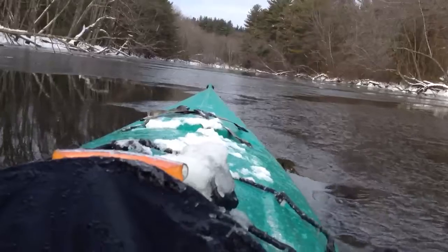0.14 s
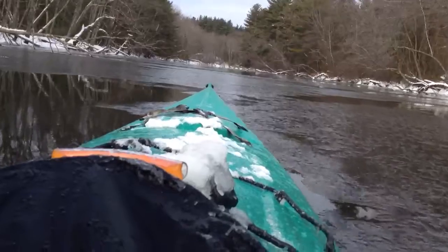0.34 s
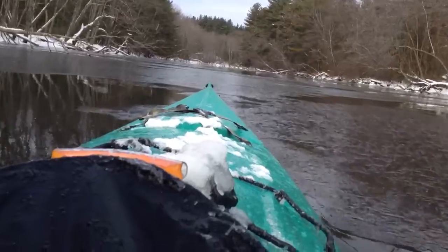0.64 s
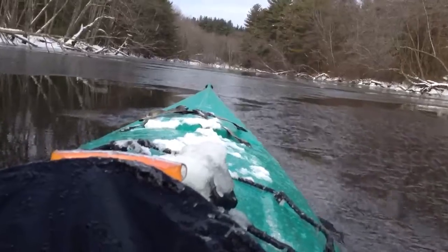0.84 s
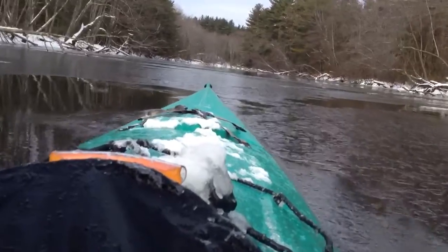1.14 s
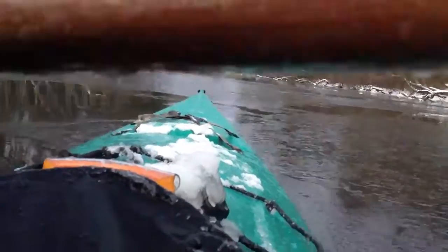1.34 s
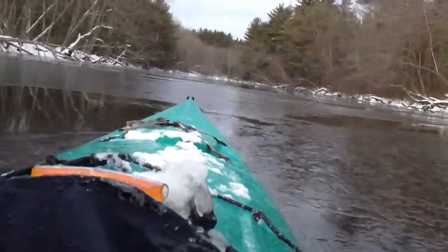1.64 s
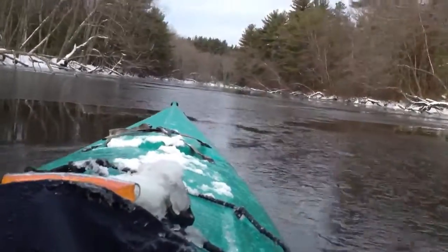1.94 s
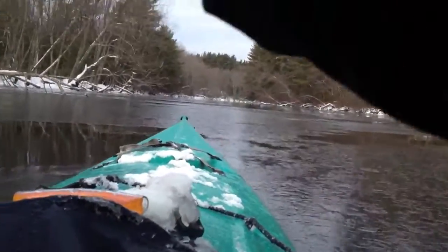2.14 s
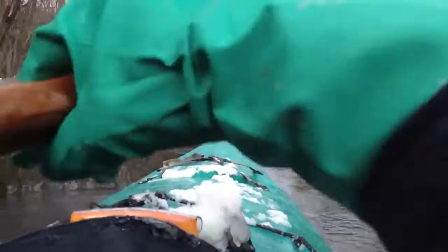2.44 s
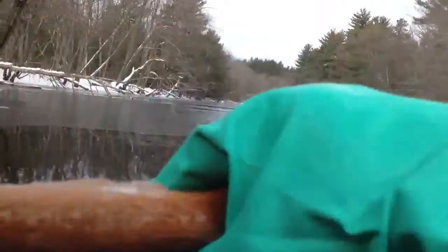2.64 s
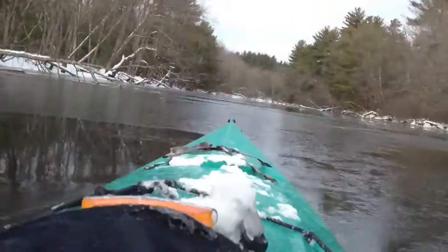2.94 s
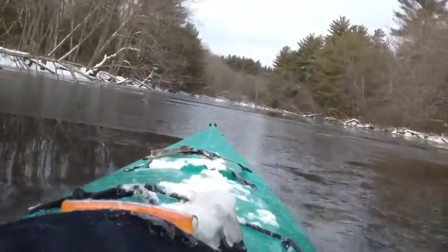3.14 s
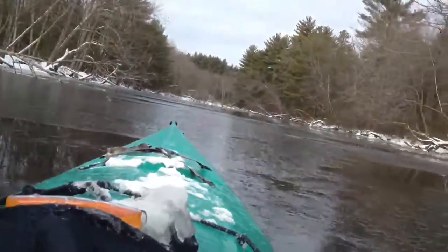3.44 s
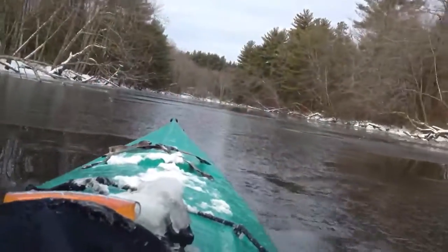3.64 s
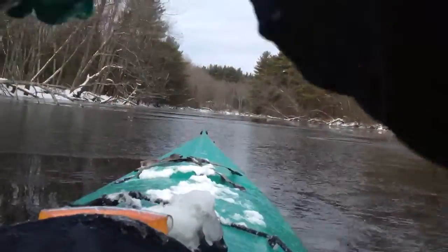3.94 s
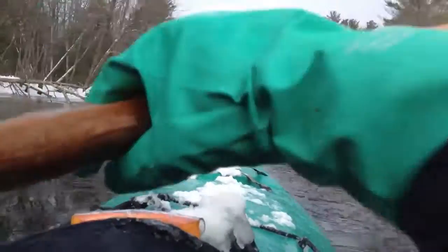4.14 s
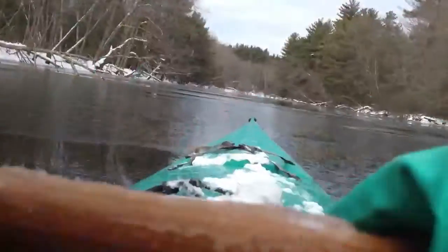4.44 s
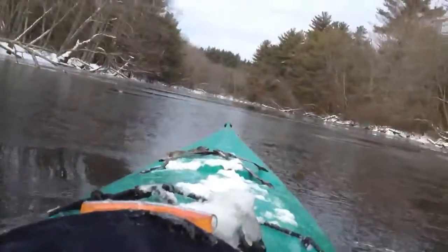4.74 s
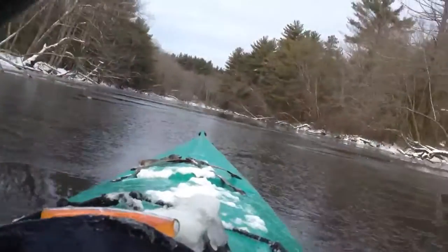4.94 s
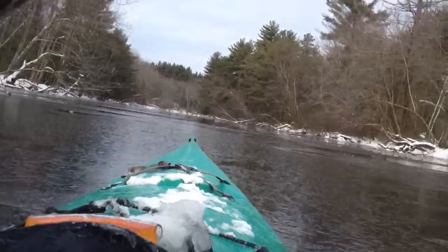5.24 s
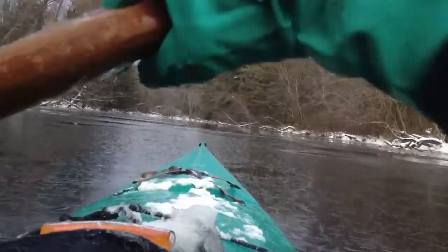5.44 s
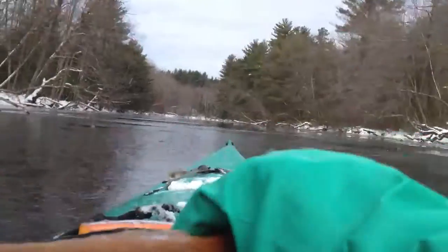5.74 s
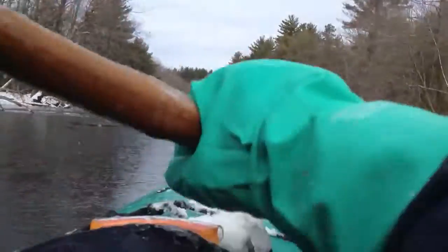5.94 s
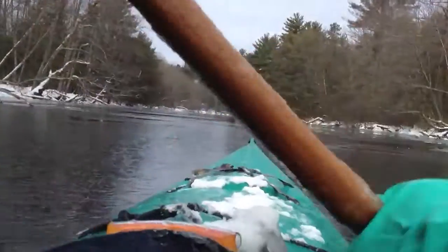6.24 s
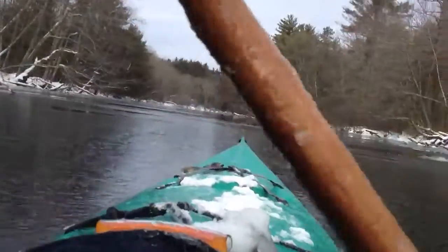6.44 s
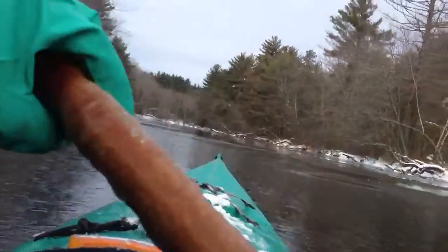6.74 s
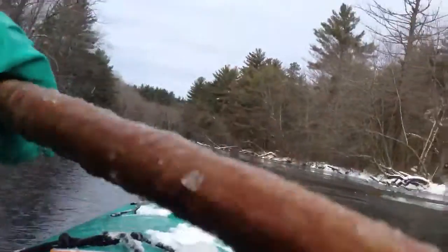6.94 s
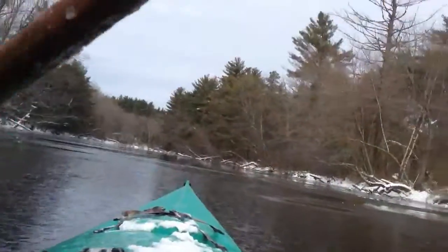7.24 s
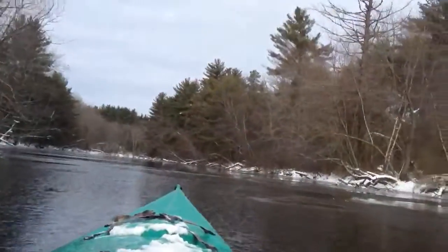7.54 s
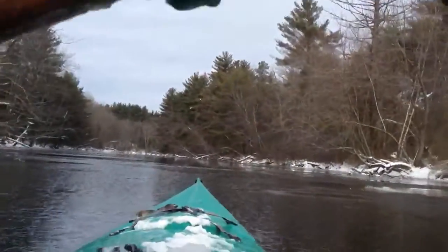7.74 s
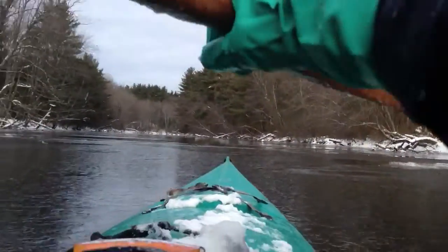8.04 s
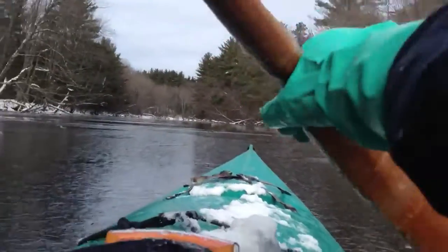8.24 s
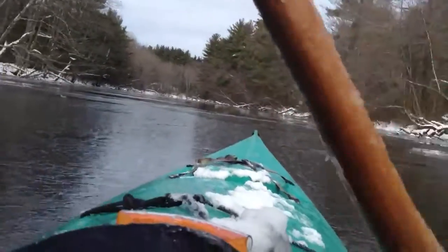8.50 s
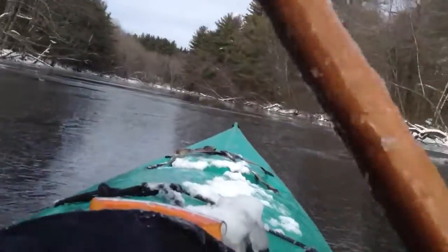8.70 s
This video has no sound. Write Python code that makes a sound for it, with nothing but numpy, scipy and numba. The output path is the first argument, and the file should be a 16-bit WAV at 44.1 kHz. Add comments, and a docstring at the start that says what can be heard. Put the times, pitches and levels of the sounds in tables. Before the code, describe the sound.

Quiet open water gives way to a faint squeak and the hiss of crushed ice along a hollow plastic boat. Plates break in dull thumps and dry ticks, thin out around four and a half seconds, then build into a rough, rumbling crunch with bright cracks. Heard close and dry by a small camera on the paddler.

```python
"""Kayak gliding into thin river ice

A plastic kayak glides from open water into thin river ice, heard by a small camera at the paddler's chest.
The sheet grinds along the hull and makes it boom; plates break with thumps and crackling bursts.
Filtered noise makes the boom, the crushed-ice hiss, the cracks and a sleeve swishing past;
short decaying sine waves make the thumps, taps and chips, and a few steady ones a faint squeak."""
import sys
import numpy as np
from scipy import signal
from scipy.io import wavfile
from scipy.ndimage import uniform_filter1d
from numba import njit

SR = 44100
rng = np.random.default_rng(int(sys.argv[2]) if len(sys.argv) > 2 else 0)


def generate_wav(signal):
    """Clip the signal to [-1, 1] and save it as 16-bit WAV at the path in sys.argv[1]."""
    frames = np.transpose(np.atleast_2d(signal))
    scaled = np.clip(frames, -1, 1) * 32767
    pcm = np.round(scaled).astype(np.int16)
    wavfile.write(sys.argv[1], SR, pcm)


N = 391166

# ways the hull vibrates: (frequency [Hz], width [Hz], level [dB])
HULL_MODES = [(115.7, 31, -13), (135.6, 25.6, -5), (174.4, 48, -1), (207.1, 41, 3.5), (250.3, 61, -2.5),
              (336.6, 82.6, -4.5), (479, 89, -10), (616, 115, -12), (936, 900, -27)]
# ways a plate of ice vibrates: (frequency [Hz], width [Hz], level [dB])
PLATE_MODES = [(890, 390, 2.5), (1510, 480, -0.5), (3270, 880, -5.5), (4630, 1900, -0.5)]
# the band near 7 kHz that the microphone port lifts: (frequency [Hz], width [Hz], level [dB])
PORT_MODES = [(6766, 983, 12.6), (7614, 1710, 12.25), (8343, 1980, 9.4)]
# the highest part of the hiss: (frequency [Hz], width [Hz], level [dB])
TOP_MODES = [(10240, 3200, 0), (13900, 5300, 0)]
# the hull in the ice: (time [s], hull boom [dB], crush hiss in the port band [dB], top of the hiss [dB])
ICE_LEVELS = [(0.731, -56, -49.5, -55.5), (0.97, -42, -47.5, -48), (1.35, -33, -45.5, -46),
              (1.9, -36, -48.5, -48.5), (2.38, -35.5, -46.5, -53.5), (2.94, -41, -50.5, -59),
              (3.78, -34.5, -47, -53.5), (4.33, -53, -52, -59.5), (4.65, -48, -52.5, -61.5),
              (4.94, -37, -45.5, -55.5), (5.26, -32, -42.5, -51), (5.71, -28, -46, -54),
              (6.33, -27, -37, -45.5), (6.69, -25.5, -38, -43.5), (7.07, -29.5, -39, -46),
              (7.42, -29, -36, -40.5), (7.91, -27.5, -38, -45), (8.23, -28.5, -42.5, -47.5),
              (8.41, -24, -37, -45), (8.87, -26.5, -41.5, -50.5)]


def undb(db):
    """Turns decibels into a factor for the sound."""
    return 10 ** (np.asarray(db) / 20)


def unit(x):
    """Scales a signal to an average (RMS) strength of 1."""
    return x / np.sqrt(np.mean(x ** 2))


@njit
def svf(x, g, k):
    """State-variable band-pass: lets one band through, with gain 1 at its centre."""
    y, b, l = np.empty(len(x)), 0., 0.
    for i in range(len(x)):
        v = (b + g * (x[i] - l)) / (1 + g * (g + k))
        b, l, y[i] = 2 * v - b, l + 2 * g * v, k * v
    return y


def ring(x, modes):
    """Sum of resonances, each filtered twice so that its sides are steep."""
    out = 0
    for n, (hz, width, db) in enumerate(modes):
        g = np.tan(np.pi * hz / SR)
        k = 1.97 * width / hz  # wide, because the second pass narrows the band
        sign = (-1) ** n  # neighbours have opposite signs
        out = out + sign * undb(db) * svf(svf(x, g, k), g, k)
    return out


def walk(rate):
    """Random levels held for 1 / rate s and smoothed twice, without slow drift; spread 1."""
    hold = int(SR / rate)
    steps = np.repeat(rng.standard_normal(N // hold + 1), hold)
    steps = uniform_filter1d(uniform_filter1d(steps, hold), hold)[:N]
    return unit(steps - uniform_filter1d(steps, 6 * hold))


def add(track, s, sound):
    """Mixes a sound into the track, starting at s seconds."""
    i = int(s * SR)
    track[i:i + len(sound)] += sound[:N - i]


def noise(modes, wander_db=0., rate=5):
    """Hiss in resonances whose levels wander each on its own."""
    drive = rng.standard_normal(N)
    out = 0
    for n, mode in enumerate(modes):
        out = out + (-1) ** n * undb(wander_db * walk(rate)) * ring(drive, [mode])
    return unit(out)


def swishes():
    """A sleeve swings past the microphone: a band of hiss rises and falls in pitch and level."""
    # passes of the cloth: (time of the middle [s], level [dB], length [s])
    passes = [(2.28, -46.5, .45), (4.009, -42.5, 0.2)]
    low_hz, high_hz, width_hz = 6520, 8050, 1300
    t, out = np.arange(N) / SR, 0
    for s, db, length in passes:
        arch = np.cos(np.pi * np.clip((t - s) / length, -.5, .5))
        hz = low_hz + (high_hz - low_hz) * arch ** 2
        phase = 2 * np.pi * np.cumsum(hz) / SR
        # two slow noises carried by cosine and sine make a band around the moving pitch
        low = signal.butter(2, width_hz / 2, fs=SR, output="sos")
        a, b = signal.sosfilt(low, rng.standard_normal((2, N)))
        band = unit(a * np.cos(phase) + b * np.sin(phase))
        out = out + undb(db) * np.sqrt(np.abs(arch)) * band
    return out


def squeak():
    """A thin tone with two overtones, falling in pitch and wavering in level as the ice arrives."""
    # path of the tone: (time [s], pitch [Hz], level [dB])
    path = [(0.55, 1885, -78), (.66, 1845, -77), (.79, 1790, -78)]
    # parts of the tone: (multiple of the pitch [1], level [dB])
    orders = [(1, -6), (2, -2), (5, -16)]
    s, hz, db = np.transpose(path)
    t = np.arange(s[0], s[-1], 1 / SR)
    phase = 2 * np.pi * np.cumsum(np.interp(t, s, hz)) / SR
    tone = np.sqrt(2) * sum(undb(d) * np.sin(k * phase) for k, d in orders)
    level = undb(np.interp(t, s, db)) * undb(3 * walk(60)[:len(t)])
    fade = signal.windows.tukey(len(t), .4)
    out = np.zeros(N)
    add(out, s[0], tone * level * fade)
    return out


def crackle(rate, spread_db, t60, bed_db, rise_s):
    """Loudness of many small breaks of uneven size that swell quickly and fade, over a steady bed."""
    sizes = undb(spread_db * np.minimum(rng.exponential(size=N), 3))
    starts = (rng.random(N) < rate / SR) * sizes
    # each break fades by 60 dB in t60 seconds
    fading = signal.lfilter([1], [1, -undb(-60 / (t60 * SR))], starts)
    loud = unit(uniform_filter1d(fading, int(rise_s * SR) + 1)) + undb(bed_db)
    # the push of the boat, not chance, sets the mean loudness
    return loud / np.sqrt(uniform_filter1d(loud ** 2, SR // 5))


def chips(count=1800, low_hz=894.0, span_oct=3.02, spread_db=5.5):
    """Loose bits of ice click together, each with its own short ring."""
    out, t = np.zeros(N), np.arange(int(.012 * SR)) / SR
    first = ICE_LEVELS[0][0]
    for when, pitch, size, ringing in rng.random((count, 4)):
        hz = low_hz * 2 ** (span_oct * pitch)
        cycles = .6 + 2 * ringing ** 8  # only a few ring on
        click = np.sin(2 * np.pi * hz * t) * np.exp(-hz * t / cycles)
        level = undb(-spread_db * np.log(size + 0.05))
        add(out, first + when * (N / SR - first), level * click)
    return unit(out)


def hollow(x):
    """A close reflection, perhaps from arms and paddle: an echo half a cycle late weakens one pitch."""
    # the moving dip: (time [s], pitch of the dip [Hz], strength of the echo [0-1])
    dips = [(1.7, 2720, 0.48), (4.2, 3270, 0.2), (4.55, 2930, 0.4), (5.15, 2780, 0.46), (5.45, 2720, 0.6),
            (5.8, 2500, 1), (6.1, 2870, 0.27), (6.9, 3370, 0.38), (7.5, 2880, 0.6), (8.1, 3000, 0.7),
            (8.5, 3000, .3)]
    s, hz, share = np.transpose(dips)
    i = np.arange(N)
    share = np.clip(np.interp(i / SR, s, share), 0, 1)
    delay = SR / (2 * np.interp(i / SR, s, hz))  # in samples
    echo = np.interp(i - delay, i, x)
    return (x + share * echo) / np.sqrt(1 + share ** 2)


def crush(port_db, middle_db, top_db):
    """Crushed ice hisses in grains; over open water the faint hiss is smooth."""
    # the middle of the hiss: (frequency [Hz], width [Hz], level [dB])
    middle_modes = [(1135, 850, -4.5), (2020, 1930, -7), (3380, 1300, -2.5), (5480, 1700, -9)]
    grainy = np.clip((port_db + 87.0) / 20.0, 0, 1)
    # brittle ice is both brighter and coarser than wet slush
    grainy = grainy * np.clip(3.0 + (top_db - port_db) / 4.2, .3, 1.3)
    breaks = crackle(rate=260., spread_db=3., t60=0.005, bed_db=7., rise_s=0.0003)
    grains = (breaks * undb(.9 * walk(110))) ** grainy
    port = undb(port_db + 0.85 * walk(55)) * noise(PORT_MODES, wander_db=1.0, rate=25)
    top = undb(top_db + 0.68 * walk(70)) * noise(TOP_MODES, wander_db=2.0, rate=47)
    flicker = undb(1.25 * grainy * walk(90))
    middle = np.sqrt(grains) * flicker * noise(middle_modes, wander_db=1.64, rate=28)
    middle = middle + undb(-4.5) * grainy * chips()
    high_pass = signal.butter(2, 4200., "high", fs=SR, output="sos")
    bright = signal.sosfilt(high_pass, port + top)
    return grains * bright + undb(middle_db) * hollow(middle)


def taps():
    """Ice knocks the hull: a quick swing dies at once or rings on, coloured by the plate and the port."""
    # short taps and knocks: (time [s], peak level [dB], pitch [Hz], ring length [cycles])
    knocks = [(1.317, -33, 2500, .3), (1.467, -25, 4000, .4), (1.597, -30, 4000, .25),
              (1.757, -28.5, 1910, 0.62), (1.822, -31, 5500, 0.27), (2.357, -28.5, 2020, 0.22),
              (2.428, -30, 1700, 0.35), (2.557, -41.5, 3500, 14), (3.497, -26, 2020, .16),
              (4.054, -30, 900, 0.36), (4.19, -33, 1500, 0.64), (4.236, -39.5, 1100, 2.1),
              (4.319, -26, 1500, .25), (4.713, -34, 1200, .4), (4.892, -31, 2020, .16),
              (5.648, -24.5, 2200, .6), (6.082, -21, 1155, 5), (6.453, -17, 3200, .4),
              (6.608, -22, 1500, .2), (6.748, -39, 3260, 10), (6.788, -27, 1370, 5.5),
              (7.247, -29.5, 845, 5), (7.755, -36, 3200, 7), (8.236, -29, 990, 6), (8.237, -25, 1700, 9),
              (8.3, -14, 5340, 4), (8.598, -21.5, 2400, .2)]
    plate_db, port_db = -20, -6
    out, t = np.zeros(N), np.arange(int(.04 * SR)) / SR
    for s, db, hz, cycles in knocks:
        click = np.sin(2 * np.pi * hz * t) * np.exp(-hz * t / cycles)
        add(out, s, undb(db) * click / click.max())
    return out + undb(plate_db) * ring(out, PLATE_MODES) + undb(port_db) * ring(out, PORT_MODES)


def cracks():
    """Each crack is a ragged burst of hiss that also rings the breaking plate."""
    # ice cracks: (time [s], level [dB], brightness: top over the level [dB], length [s])
    bursts = [(0.05, -57, -12, 0.0066), (0.866, -46.5, -1, 0.004), (1.134, -44, 4, 0.009),
              (1.402, -41.5, -3, 0.016), (1.467, -37.5, -5, 0.003), (1.503, -44.5, 4, 0.011),
              (1.626, -43, 0, 0.022), (1.759, -43, 5, 0.0085), (1.874, -40.5, -5, 0.0078),
              (1.943, -44, 8, 0.016), (2.007, -40, 2, 0.0042), (2.05, -47, 5, 0.0021),
              (2.098, -62, 14, 0.005), (2.255, -48, 7, 0.004), (2.323, -41, -2, 0.028),
              (2.812, -47, -2, 0.0071), (3.063, -39.5, -7, 0.0042), (3.431, -42, -6, 0.0052),
              (3.506, -43.5, -9, 0.012), (3.518, -40, -15, 0.039), (3.676, -45, -1, 0.0028),
              (3.83, -54, -12, 0.0029), (4.912, -37.5, -24, 0.0074), (5.078, -37.5, -4, 0.0034),
              (6.079, -25, -9, 0.01), (6.104, -28, -17, 0.0033), (6.121, -31, -12, 0.0092),
              (6.145, -35, -9, 0.017), (6.304, -37.5, -4, 0.038), (6.774, -35.5, -2, 0.013),
              (6.792, -28, -8, 0.0091), (6.808, -35.5, -4, 0.014), (7.247, -31, -13, 0.023),
              (7.272, -33.5, -7.5, 0.028), (7.757, -41.5, -7, 0.074), (7.808, -33, -17, 0.014),
              (7.823, -34.5, -12, 0.008), (8.234, -24, -5.5, 0.015), (8.259, -26.5, -8, 0.024),
              (8.31, -28, -8, 0.015), (8.371, -30.5, -0.5, 0.0026), (8.385, -33, 2, 0.0051),
              (8.396, -31, -3, 0.0026), (8.519, -31.5, -5, 0.0081), (8.62, -35.5, -4, 0.0023)]
    plate_rel_db, plate_per_db = -4.5, 1.2649  # plate ring over a crack of -35 dB; dB per dB of crack
    rise = 0.33  # as a share of the length
    rustle, rustle_lengths = 0.78, 2.26  # size beside the run; decay in crack lengths
    snap, snap_s = 0.66, 0.0025  # sharp start: size beside the run, decay [s]
    t = np.arange(int(.3 * SR)) / SR
    power = np.zeros((3, N))
    for s, port_db, bright_db, length in bursts:
        top_db = port_db + bright_db
        plate_db = -35 + plate_rel_db + plate_per_db * (port_db + 35)
        # the crack runs on through the sheet for a while, then stops; splinters rustle after it
        run = t / length
        shape = (1 - np.exp(-run / rise)) * (np.exp(-run ** 4) + rustle * np.exp(-run / rustle_lengths))
        shape = shape + snap * np.exp(-t / snap_s)
        for track, db in zip(power, (port_db, plate_db, top_db)):
            add(track, s, (undb(db) * shape) ** 2)
    port, plate, top = undb(1.3 * walk(250)) * np.sqrt(power)
    drive = rng.standard_normal(N) * undb(2.3 * walk(300))  # the plate breaks in separate splits
    struck = sum(undb(0.87 * walk(60)) * ring(drive * plate, [mode]) for mode in PLATE_MODES)
    struck = struck / np.std(ring(drive, PLATE_MODES))
    return port * noise(PORT_MODES) + struck + top * noise(TOP_MODES)


def thumps(reach_oct=.28, knock_hz=400.):
    """Each blow swells and dies in the hull modes nearest to the struck part, and knocks in the upper ones."""
    # plates giving way under the bow: (time of the peak [s], peak of the boom [dB], pitch of the struck part [Hz])
    blows = [(1.001, -36, 242), (1.142, -22.5, 234), (1.224, -24.5, 228), (1.412, -19, 200),
             (1.563, -26, 215), (1.686, -20, 220), (1.899, -26, 600), (2.018, -20.5, 280),
             (2.145, -17.5, 259.7), (2.298, -16.5, 288), (2.331, -13.5, 240), (2.428, -20.5, 223),
             (2.548, -22, 201), (2.671, -23.5, 266.6), (2.71, -21.5, 291), (2.833, -23.5, 208),
             (2.859, -22.5, 320), (3.075, -23, 256), (3.256, -23.5, 212), (3.522, -26, 227),
             (3.593, -28, 690), (3.614, -23, 198.8), (3.65, -24, 207), (3.681, -30.5, 700),
             (3.789, -21, 173), (4.177, -29.5, 149), (4.797, -26.5, 244), (4.989, -23, 250),
             (5.813, -21, 214), (6.028, -20, 205), (6.389, -16.5, 231), (6.592, -15.5, 230),
             (6.642, -17, 247), (6.833, -31.5, 825), (7.062, -19, 208), (7.347, -18.5, 230),
             (7.451, -20, 550), (8.009, -17.5, 221), (8.219, -20.5, 194), (8.359, -19.5, 252),
             (8.442, -20, 234), (8.569, -11.5, 266)]
    # knock over the boom for a part at 220 Hz; stiffer parts knock harder
    knock_base_db, knock_db_per_oct, knock_scatter_db = -16, 7, 4
    out, t = np.zeros(N), np.arange(int(.12 * SR)) / SR
    hz, width, db = np.transpose(HULL_MODES)[:, :, None]
    upper = hz[:, 0] > knock_hz
    chances = rng.random((len(blows), 1 + len(HULL_MODES)))
    for (s, peak_db, pitch), (hard, *turn) in zip(blows, chances):
        knock_db = knock_base_db + knock_db_per_oct * np.log2(pitch / 220)
        knock_db = knock_db + knock_scatter_db * (2 * hard - 1)
        near = np.exp(-(np.log2(hz / pitch) / reach_oct) ** 2) + 0.14
        swell = 1.7 * np.pi * np.minimum(width, 60.) * t
        swing = np.sin(2 * np.pi * (hz * t + np.c_[turn]))  # each mode starts at a random point of its cycle
        modes = undb(db) * near * swell ** 2 * np.exp(-swell) * swing
        boom, knock = modes[~upper].sum(axis=0), modes[upper].sum(axis=0)
        blow = boom / np.abs(boom).max() + undb(knock_db) * knock / np.abs(knock).max()
        # start early, so that the boom peaks at the listed time
        add(out, s - t[np.abs(boom).argmax()], undb(peak_db) * blow)
    return out


def grind(boom_db, rattle_db):
    """The ice edge judders along the hull and drives its modes, the upper ones in rougher jolts."""
    judder_db, judder_per_boom = 2.5, -0.12  # depth at a boom of -35 dB; light contact is lumpier
    depth_db = np.clip(judder_db + judder_per_boom * (boom_db + 35), 0, 3.5)
    depth_db = depth_db * np.clip((boom_db + 62) / 8, .3, 1)  # open water judders little
    judder = depth_db * walk(32)
    drive = rng.standard_normal(N) * undb(judder)
    # the contact slides about, so each low mode swells and fades in its own lumps
    low = 0
    for n, mode in enumerate(HULL_MODES[:5]):
        low = low + (-1) ** n * ring(drive * undb(1.2 * walk(9)), [mode])
    jolts = undb(1.34 * judder + 1.27 * walk(60))
    high = ring(rng.standard_normal(N) * jolts, HULL_MODES[5:])
    return undb(boom_db) * unit(low) + undb(rattle_db) * unit(high)


def scene():
    """Levels follow the hull from open water into the ice, and all the sounds are added up."""
    # before the bow meets the ice: (hull boom [dB], hiss in the port band [dB], top of the hiss [dB])
    open_water = (-64, -76, -77.5)
    meet_s = 0.028  # time taken to go from open water to the first ice level
    rattle_rel_db, rattle_per_boom = -7.5, 0.87  # upper hull modes over a boom of -40 dB; dB per dB of boom
    # middle of the hiss over a port-band hiss of -45 dB; dB per dB of hiss and of boom
    middle_rel_db, middle_per_hiss, middle_per_boom = -8.5, 0.59, 0.083
    middle_start_db, middle_swell_s = -8, 0.25
    t = np.arange(N) / SR
    first = ICE_LEVELS[0][0]
    s, *columns = np.transpose([(first - meet_s, *open_water)] + list(ICE_LEVELS))
    boom_db, port_db, top_db = (np.interp(t, s, c) for c in columns)
    rattle_db = -40 + rattle_rel_db + rattle_per_boom * (boom_db + 40)
    middle_db = -45 + middle_rel_db + middle_per_hiss * (port_db + 45) + middle_per_boom * (boom_db + 40)
    # the middle builds up as the bow bites in
    since = t - first
    held_back = np.exp(-np.abs(since) / middle_swell_s) * np.clip(1 + since / meet_s, 0, 1)
    middle_db = middle_db + middle_start_db * held_back
    ice = grind(boom_db, rattle_db) + thumps() + crush(port_db, middle_db, top_db) + cracks() + taps()
    return (ice + swishes() + squeak())[None]


def record(dry):
    """The small microphone loses the deep bass; the camera rounds the loudest peaks and cuts the top steeply."""
    low_hz, top_hz = 57.3, 15300
    limit = .6  # peaks bend towards this height (full scale is 1)
    bass_cut = signal.butter(2, low_hz, "high", fs=SR, output="sos")
    thin = signal.sosfilt(bass_cut, dry)
    rounded = limit * np.tanh(thin / limit)
    top_cut = signal.ellip(10, .2, 60, top_hz, fs=SR, output="sos")
    return signal.sosfilt(top_cut, rounded)


dry = scene()
out = record(dry)
generate_wav(out)
```